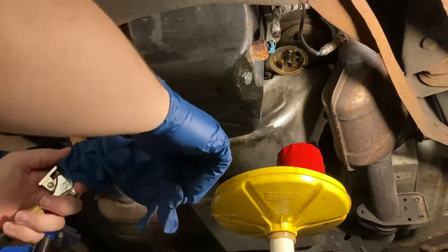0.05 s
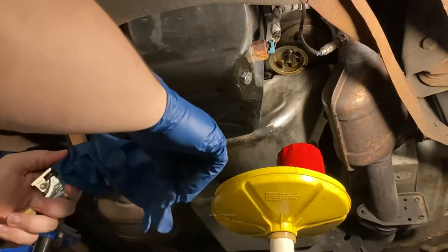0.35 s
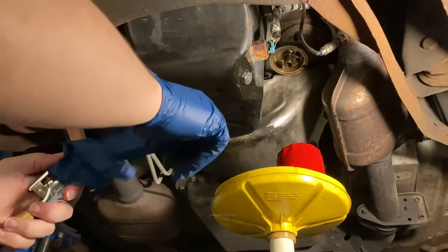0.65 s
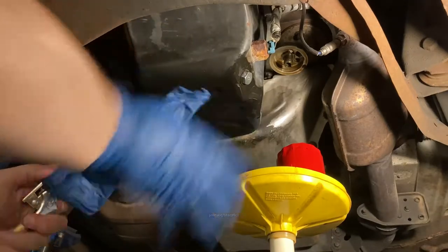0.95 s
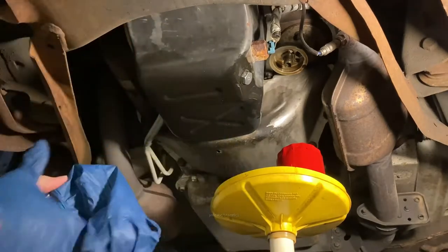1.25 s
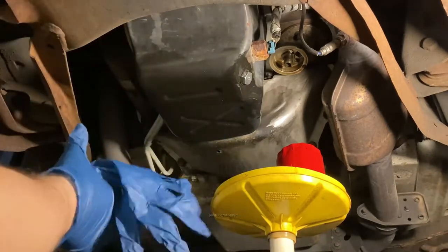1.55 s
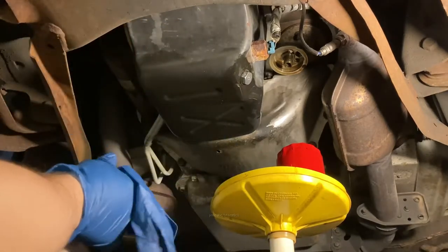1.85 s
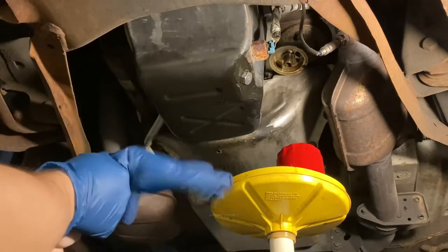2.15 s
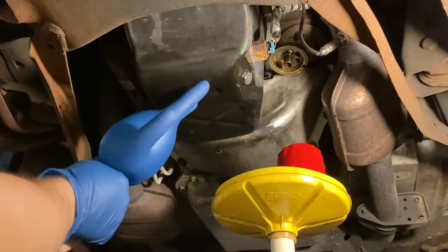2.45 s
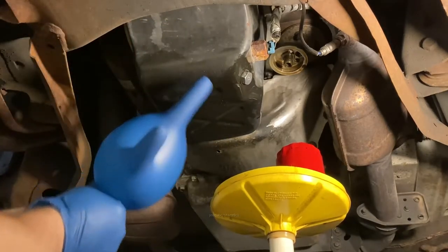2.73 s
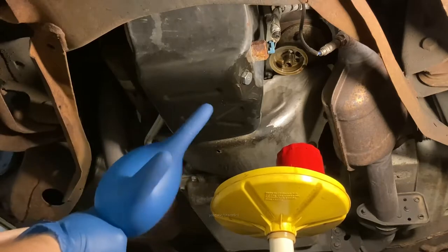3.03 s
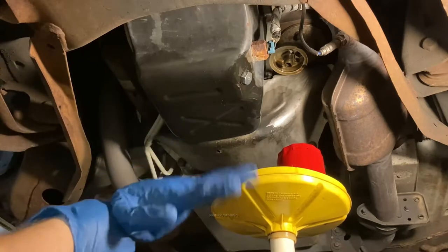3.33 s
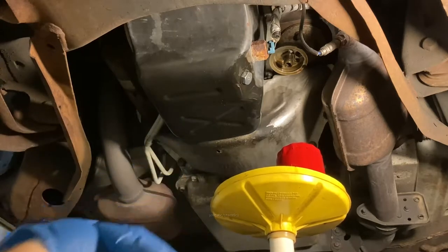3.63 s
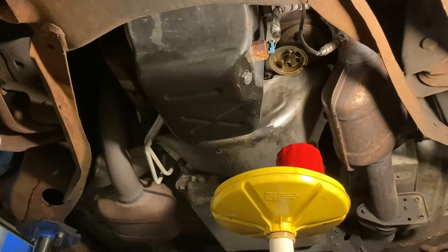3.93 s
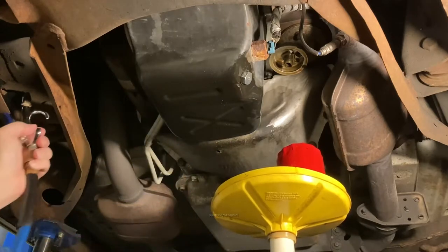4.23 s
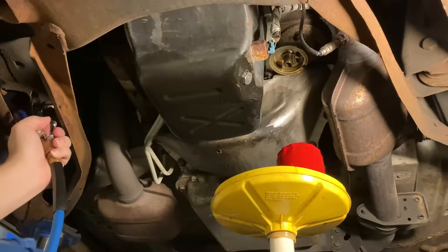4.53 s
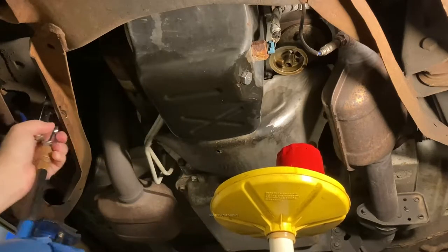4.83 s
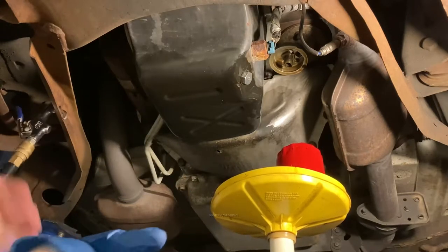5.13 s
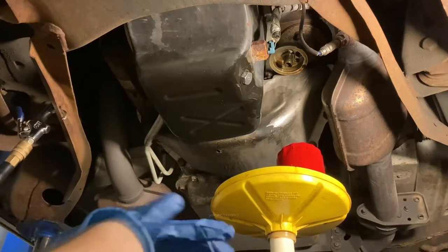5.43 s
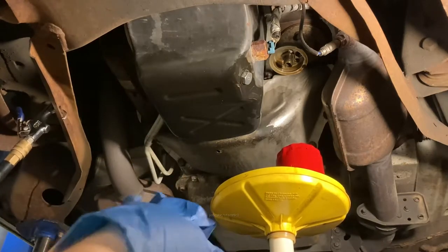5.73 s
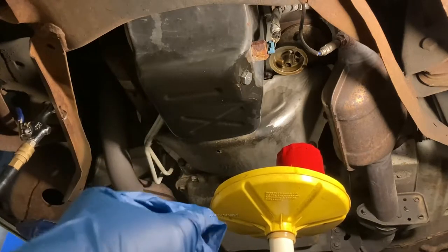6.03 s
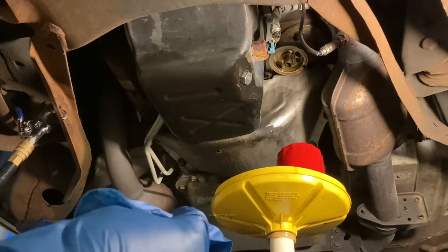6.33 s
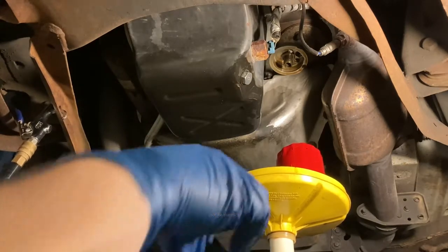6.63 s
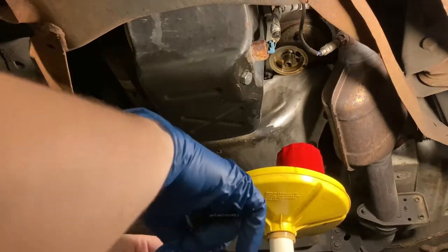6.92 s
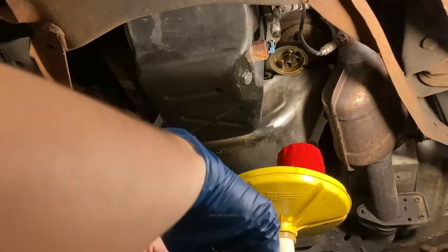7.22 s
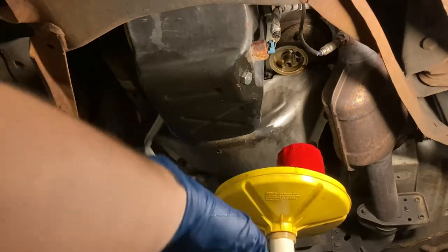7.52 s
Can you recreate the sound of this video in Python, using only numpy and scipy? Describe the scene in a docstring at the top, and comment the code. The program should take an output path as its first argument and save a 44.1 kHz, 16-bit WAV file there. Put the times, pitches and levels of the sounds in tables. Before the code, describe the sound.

A thin, shifting hiss of escaping air runs beneath two close, nearly dry blasts from an air gun into a rubber glove: one brief and fluttering, one longer and hollow. The glove softly deflates and the leak dies away. A small cluster of metallic knocks follows, slightly left, as the gun meets a car's chassis, then very quiet glove rustles. A far machine hums low in the garage throughout.

```python
"""An air gun fires two blasts into a rubber glove, under a car in a garage.
The first blast flaps the loose cuff; the second seals it, and the glove swells, then sighs empty.
The gun leaks, so it hisses until it is carried off and hung on the steel chassis with a few knocks.
Rubber gloves then rub and crinkle, and a distant machine hums low under it all."""
import sys
import numpy as np
from scipy import signal
from scipy.fft import rfft, irfft
from scipy.io import wavfile

SR = 44100
rng = np.random.default_rng(int(sys.argv[2]) if len(sys.argv) > 2 else 0)


def transcribe(u):
    """Save the signal u as a 16-bit wav file named by the first command-line argument.

    u: samples, shape (n,) or (channels, n), limited to [-1, 1]; the rate is SR.
    q: integer samples, one column per channel.
    """
    v = np.clip(np.atleast_2d(u).T, -1, 1)
    q = np.round(v * 32767).astype(np.int16)
    wavfile.write(sys.argv[1], SR, q)


N = 338228
TIME, HZ = np.arange(N) / SR, np.fft.rfftfreq(N, 1 / SR)

# Pulls of the trigger. Each row: time fully open and time held in seconds; levels in dB of the jet,
# the cuff and the glove's hollow; boost of the first flap in dB; the hollow's pitch in Hz when empty
# and when full; the hollow's head start in seconds; flutter from 0 to 1.
TRIGGER_PULLS = [(0.429, 0.14, -12.5, -22, -26, 5.5, 1371, 1214, -0.0048, 0.3),
                 (2.108, 0.8, -16, -25.5, -26, 14, 1645, 891.4, .014, 0)]


def blasts(fill_s=0.11, taut_s=0.058, snap_s=0.016, hollow_width_hz=900):
    """The jet fizzes, the loose cuff slaps, and the glove's hollow sinks in pitch as it swells."""
    # Tone of the nozzle jet and of the rasping cuff. Each row: frequency in Hz, level in dB.
    jet_tone = [(200, -31.5), (2000, -31), (5000, -33.5), (7000, -7), (8300, -2.5), (9400, 2.5),
                (12000, 1.5), (14000, -2.5), (15800, -4.5)]
    cuff_tone = [(60, -34), (170, -12.5), (400, -2), (1000, -3), (2000, -3), (2750, 1), (3700, 5),
                 (4500, 2.5), (6500, 1), (8500, 0.5), (15000, -22)]
    swirl_tone = [(60, -10), (300, -3.5), (550, -0.5), (900, -2.5), (1500, -4), (3000, -0.5),
                  (8000, -23.5)]
    # The cuff gapes and lets more air past. Each row: time and half length in seconds,
    # change of the rasp in dB, change of the hollow in dB.
    gapes = [(0.462, 0.0075, 4.5, 1.5), (0.549, 0.013, 6, 1), (2.112, 0.006, 3.5, -2), (2.357, 0.055, 2, 6),
             (2.868, 0.011, 2.5, -5), (3.075, 0.04, 4.5, 6)]
    jet = air(jet_tone, direct=0.52, lag=10)
    cuff = air(cuff_tone, direct=0.5, lag=6.38)
    flapping = treble(cuff, corner_hz=1300)
    swirl = pan(air(swirl_tone, direct=0.96, lag=6.65), left_db=3.5)  # air inside the glove
    slaps = wander(170, N)
    shudder_db = 1.8 * wander(90, N)  # the stretched rubber shakes unevenly
    cuff_gape = amp(sum(db * bell(TIME - s, half) for s, half, db, _ in gapes))
    hollow_gape = amp(sum(db * bell(TIME - s, half) for s, half, _, db in gapes) + shudder_db)
    out = np.zeros((2, N))

    def flow(span, jet_db, rasp, hollow, flutter):
        """The cuff opens and shuts, chopping both the jet and the sound of the glove."""
        gap = np.exp(.5 * flutter * slaps[span] - (.5 * flutter) ** 2)  # keeps the average power
        glove = cuff_gape[span] * rasp + hollow_gape[span] * hollow
        return amp(jet_db) * jet[:, span] * gap ** 0.6 + gap * glove

    for start, held, jet_db, cuff_db, hollow_db, flap_db, empty_hz, full_hz, early, flutter \
            in TRIGGER_PULLS:
        span = (TIME > start - .5) & (TIME < start + held + .5)
        t, inside = TIME[span] - start, swirl[:, span]
        # the factors on these times are rises and falls in dB per second
        age, since_shut = np.maximum(t, 0), np.maximum(t - held, 0)
        opening_db = 852.5 * np.minimum(t, 0)
        hollow_shape_db = 1398 * np.minimum(t + early, 0) - 10 * age - 281.5 * since_shut
        # the cuff flaps ever more weakly, until the glove snaps taut with a low puff
        loose = np.interp(t, [0, taut_s, taut_s + snap_s], [1, 0.53, 0])
        puff = amp(-28) * bell(t - taut_s, 0.019) * band(inside, 465, width_hz=1000)
        rasp = cuff[:, span] + (amp(flap_db * loose) - 1) * flapping[:, span]
        rasp *= amp(cuff_db + opening_db - 174 * since_shut)
        hz = full_hz + (empty_hz - full_hz) * np.exp(-age / fill_s)
        body = amp(4.5 * loose) * band(inside, hz, hollow_width_hz)
        overtone = amp(-24.5) * band(inside, 2.5 * hz, hollow_width_hz)
        # the hollow rings briefly as the air first strikes it
        ring = amp(4) * bell(t + early - 0.0099, 0.025) * band(inside, hz, width_hz=380)
        hollow = (body + overtone + ring) * amp(hollow_db + hollow_shape_db)
        fizz_db = jet_db + opening_db + 2.5 * loose - 396.5 * since_shut
        out[:, span] += flow(span, fizz_db, rasp + puff, hollow, flutter + 0.19 * loose * (t > 0))

    # after the last blast the glove sighs empty: steady for a moment, then fading
    let_go = start + held
    span = (TIME > let_go) & (TIME < let_go + 1)
    fade_db = -150 * np.maximum(TIME[span] - let_go - 0.22, 0)
    rasp = amp(fade_db - 38) * cuff[:, span]
    hollow = amp(fade_db - 46) * band(swirl[:, span], 1310, hollow_width_hz)
    out[:, span] += flow(span, fade_db - 38.5, rasp, hollow, flutter=0.26)
    return out


def leak(waver_db=0.84, sag_db=-11):
    """A thin jet escapes from the gun and changes tone as the gun is carried away."""
    # The leak as the gun moves. Each row: time in seconds, level in dB, brightness in dB.
    course = [(0, -38.5, -2.5), (.2, -34.5, 2.5), (.4, -28, 3), (.9, -24.5, -1.5), (1.1, -25.5, 0.5),
              (1.22, -25.5, 2.5), (1.35, -30.5, -3), (1.85, -29, -6), (2.1, -31, 2), (3.201, -46, -12),
              (3.55, -42, -6), (3.8, -41, -3.5), (3.97, -42.5, -7), (4.28, -51, -4.5), (4.55, -68, -14.5)]
    # Its tone beside the glove and at arm's length. Each row: frequency in Hz, level in dB.
    near_tone = [(150, -8.5), (400, -13.5), (1000, -18), (1800, -14), (2450, -3.5), (3400, 0), (4300, -6.5),
                 (6300, 0.5), (7400, -5.5), (9000, -3.5), (10800, -7), (13000, -0.5), (15600, -10)]
    far_tone = [(150, -10), (400, -32), (1200, -43), (1700, -7), (2200, -2), (3400, -0.5), (5300, -2.5),
                (6500, 1), (8800, 1), (10800, -3.5), (13000, 1), (14500, -3), (15600, -7.5)]
    # Narrow bands of hiss stand out and glide as the gun turns. Each row: time and half length in
    # seconds, pitch in Hz, glide in octaves per second, level against the hiss in dB.
    glints = [(0.947, 0.17, 6340, 0.089, -4.5), (1.375, 0.089, 7600, 0.27, -8.5),
              (3.97, 0.047, 3800, 1.4, -4.5), (4.002, 0.14, 2450, 0.34, -5.5), (4.12, .08, 6800, 0.56, -10),
              (4.263, 0.13, 4600, 0.38, -7)]
    level_db, bright_db = follow(course, TIME)
    for start, held, *_ in TRIGGER_PULLS:  # each blast drains the hose, so the leak sags
        level_db += sag_db * bell(TIME - start - held - 0.105, 0.062)
    away = np.interp(TIME, [2.2, 3.3], [0, 1])
    near = pan(air(near_tone, direct=0.62, lag=9.96), left_db=0.5)
    far = pan(air(far_tone, direct=0.72, lag=11.9), left_db=1)
    hiss = np.sqrt(1 - away) * near + np.sqrt(away) * far
    hiss += (amp(bright_db) - 1) * treble(hiss, corner_hz=7005)
    hiss = surface_echo(hiss) / amp(bright_db / 2)
    white = air([(100, 0), (16000, 0)], direct=0.87, lag=9.38)
    for at, half, hz, glide, db in glints:
        span = abs(TIME - at) < .5
        t = TIME[span] - at
        glint = band(white[:, span], hz * 2 ** (glide * t), width_hz=750)
        hiss[:, span] += amp(db) * bell(t, half) * glint
    hiss *= amp(level_db + waver_db * wander(25, N)) * (TIME < course[-1][0])
    return near_echoes(hiss, echo=.27, drift=.1, first_s=0.000504, last_s=.005)


def knocks(boom_hz=720, bright_hz=2000, tick_s=0.015, thud_rise_s=0.00033, ring_rise_s=0.00076):
    """Each knock ticks, chatters and rings the steel: hard ones wake high notes, blunt ones low."""
    # Gun and hand hit the chassis. Each row: start in seconds; level, brightness and hollow boom
    # in dB; length of the chatter in seconds.
    hits = [(4.445, -39.5, -2, 5, 0.006), (4.452, -30.5, -35, 8.5, 0.019), (4.6, -44.5, 6, 1, 0.0093),
            (4.61, -42, -5, 13, 0.027), (4.669, -44.5, 0, 8, 0.27), (4.716, -26, 7.5, -4, 0.012),
            (4.722, -18.5, -7, -1.5, 0.031), (4.738, -33, -11, 2, 0.0083), (4.835, -45, -5, -1, 0.034),
            (4.914, -54, 6, -2.5, 0.0082), (5.313, -46.5, -8.5, -16, 0.01), (7.085, -52.5, -9.5, -12, .004)]
    # Tone of the chatter. Each row: frequency in Hz, level in dB.
    chatter_tone = [(100, -29), (220, -32.5), (320, -8.5), (420, -14), (600, -2.5), (790, -6.5), (980, -1),
                    (1350, -6.5), (1900, -5.5), (2600, -18), (3700, -9), (4600, -12.5), (5700, -24),
                    (10000, -23), (15000, -48)]
    # Notes of the chassis. Each row: pitch in Hz, relative level in dB, seconds to fade by 60 dB.
    steel_notes = [(325, -3.5, 0.073), (526, 6, 0.092), (636, 5.5, 0.14), (973, 3, 0.15), (1030, 0, 0.13),
                   (1100, 2.5, 0.11), (1290, -0.5, 0.11), (1413, 0.5, 0.091), (1614, -2.5, 0.19),
                   (1720, -4, 0.3), (2010, -11, 0.44), (2345, -17.5, 0.19), (2980, -15, 0.18),
                   (3670, -13, 0.23), (4440, -9.5, 0.17)]
    chatter = air(chatter_tone, direct=0.24, lag=5.3)
    low, top = chatter - treble(chatter, boom_hz), treble(chatter, bright_hz)
    tick = treble(top, corner_hz=6000)
    hz, note_db, fade_s = np.transpose(steel_notes)[:, :, None]
    high, deep = hz ** 4 / (hz ** 4 + bright_hz ** 4), boom_hz ** 4 / (hz ** 4 + boom_hz ** 4)
    t, out = TIME[:SR // 2], np.zeros((2, N))
    for start, level_db, bright_db, boom_db, length in hits:
        span = slice(round(start * SR), round(start * SR) + len(t))
        edge = top[:, span] - (1 - np.exp(-t / tick_s)) * tick[:, span]  # the sharpest part dies first
        contact = chatter[:, span] - top[:, span] + amp(bright_db) * edge
        contact += (amp(boom_db) - 1) * low[:, span]
        thud = (1 - np.exp(-t / thud_rise_s)) * np.exp(-(t / length) ** 2) * contact
        heights = amp(note_db + bright_db * high + boom_db * deep) / np.linalg.norm(amp(note_db))
        phase = rng.random(hz.shape) + 0.19 * rng.standard_normal((2, *hz.shape))  # one per side
        # each knock lands on another spot, which shifts the level and pitch of every note
        louder, sharper = rng.standard_normal((2, *hz.shape))
        pitch = hz * (1 + .005 * sharper)
        notes = heights * amp(2 * louder - 60 * t / fade_s) * np.sin(2 * np.pi * (pitch * t + phase))
        ring = notes.sum(1) * (1 - np.exp(-t / ring_rise_s))
        out[:, span] += amp(level_db) * (.42 * thud + 1.15 * ring)
    return pan(out, left_db=3)


def clinks(touch_s=4.446, settle_s=4.979):
    """Small metal parts ring softly: the gun as it first touches, its hook as it settles."""
    # Notes of the gun and its hook. Each row: pitch in Hz, level in dB, seconds to fade by 60 dB.
    gun_notes = [(3020, -60, 0.18), (4530, -52, 0.12)]
    hook_notes = [(340, -44, 0.12), (656, -49, 0.062), (1147, -46, 0.13), (1190, -51, .06)]
    out = np.zeros(N)
    for start, notes, rise_s in [(touch_s, gun_notes, 0.0005), (settle_s, hook_notes, 0.0039)]:
        t = np.maximum(TIME - start, 0)
        rise = 1 - np.exp(-t / rise_s)
        for hz, db, fade_s in notes:
            out += rise * amp(db - 60 * t / fade_s) * np.sin(2 * np.pi * (hz * t + rng.random()))
    return pan(out, left_db=2)


def rustles(grain_db=3):
    """Rubber slides over rubber in short grainy strokes."""
    # Rubs and snaps. Each row: time in seconds, level in dB, brightness in dB, half length in seconds.
    strokes = [(5.343, -56, 15, 0.0021), (5.35, -62, 12, 0.029), (5.416, -58.5, 6, 0.018),
               (5.464, -62, -14, 0.0038), (5.5, -66, -15, 0.0042), (5.554, -68, -8, .004),
               (6.011, -71.5, -14.5, 0.0075), (6.9, -69.5, 6.5, 0.021), (6.949, -52.5, -3, 0.0038),
               (7.07, -62, 5.5, 0.024), (7.229, -63, -4, 0.0032), (7.424, -51, 18.5, 0.0061),
               (7.435, -63, 2.5, 0.029), (7.529, -68.5, 7, 0.0095), (7.595, -64.5, 7, 0.028)]
    # Tone of the rubbing. Each row: frequency in Hz, level in dB.
    rubber_tone = [(200, -5.5), (800, 9), (1500, 12.5), (3000, 5), (5500, -9.5), (8000, -1.5), (12000, -3),
                   (15500, -8)]
    rub = air(rubber_tone, direct=0.16, lag=7.7) * amp(grain_db * wander(320, N))
    top = treble(rub, corner_hz=4800)
    return sum(amp(db) * bell(TIME - s, half) * unit(rub + (amp(bright_db) - 1) * top)
               for s, db, bright_db, half in strokes)


def crinkles(per_s=110, spread_db=2.5, fade_s=.006):
    """Folds of the handled glove flip over with tiny ticks of uneven size."""
    # How hard the glove is handled. Each row: time in seconds, level in dB.
    handling = [(5.25, -70), (5.551, -68), (5.9, -74), (6.5, -72), (6.95, -74), (7.65, -70)]
    # Tone of a crinkle. Each row: frequency in Hz, level in dB.
    crinkle_tone = [(300, -16.5), (1300, 3.5), (3500, 0.5), (5500, -15.5), (7500, -14), (12000, -14),
                    (15500, -19)]
    flips = rng.random(N) < per_s / SR
    sizes = flips * amp(spread_db * np.minimum(rng.exponential(1, N), 3))
    ticks = unit(signal.lfilter([1], [1, -np.exp(-1 / (fade_s * SR))], sizes))
    level = amp(follow(handling, TIME)[0]) * (TIME > handling[0][0])
    return air(crinkle_tone, direct=0.33, lag=7.6) * ticks * level


def background(room_db=-57, early_boost_db=5, drop_s=2.2):
    """Dull room noise and the unsteady hum of a distant machine, which steps down in level once."""
    # Tone of the room noise. Each row: frequency in Hz, level in dB.
    room_tone = [(20, -44.5), (32, -26), (45, 0), (62, -3), (84, -2), (110, -16.5), (160, -17.5),
                 (220, -9.5), (400, -14.5), (800, -18), (1500, -24.5), (2150, -25), (2800, -32.5),
                 (4200, -31), (5000, -39), (8000, -39), (13000, -47), (15500, -60)]
    # The machine's hum. Each row: pitch in Hz, level after the drop in dB, width in Hz.
    hum_bands = [(63.8, -65.5, 8.3), (79.5, -55, 13), (154.5, -64.5, 10)]
    rumble = air([(50, 0.012), (200, 0)], direct=0.74, lag=-15)
    hum = sum(amp(db) * band(rumble, hz, width) for hz, db, width in hum_bands)
    hum *= amp(early_boost_db * (TIME <= drop_s))
    return pan(amp(room_db) * air(room_tone, direct=0.12, lag=-14) + hum, left_db=-1)


def surface_echo(x, blur_above=2.4):
    """An echo off the nearest surface cuts a notch in the tone, which rises as the gun closes in."""
    # The gun passes a surface. Each row: time in seconds, lowest notch in Hz, echo strength 0 to 1.
    passes = [(.8, 1490, 0), (1.15, 3400, 0), (1.3, 5470, 0.2), (1.55, 6200, 0.1), (1.8, 10200, 0),
              (2.2, 9800, 0.23), (3.549, 1800, 0), (3.78, 5300, 0.18), (4.021, 5900, 0.35), (4.2, 9000, 0),
              (4.4, 9900, 0.2)]
    hz, t, spectrum = signal.stft(x, SR, nperseg=512, noverlap=384)
    notch_hz, strength = follow(passes, t)
    ratio = hz[:, None] / notch_hz
    echo = strength / (1 + (ratio / blur_above) ** 4)  # the surface is uneven, so higher notches blur
    paths = (1 + echo * np.exp(-1j * np.pi * ratio)) / np.sqrt(1 + echo ** 2)
    return signal.istft(spectrum * paths, SR, nperseg=512, noverlap=384)[1][:, :N]


def near_echoes(x, echo, drift, first_s, last_s, corner_hz=900, count=8):
    """Echoes off arm, glove and car cut rows of notches in the tone, which slide as the hand moves."""
    # The hand's distance from these surfaces. Each row: time in seconds, factor on the echo delays.
    distances = [(0, 1.095), (2.2, 1.057), (3.7, 1.4), (4.4, 1.37)]
    hz, t, spectrum = signal.stft(x, SR, nperseg=1024, noverlap=768)
    f, reach, paths = hz[:, None], follow(distances, t)[0], 1
    strength = echo * f ** 2 / (f ** 2 + corner_hz ** 2)  # small surfaces return only short waves
    for delay in np.geomspace(first_s, last_s, count):
        moving_delay = delay * (reach * rng.uniform(0.92, 1.15) + drift * wander(1.5, len(t)))
        paths = paths + strength * np.exp(-2j * np.pi * f * moving_delay)
    paths = paths / np.sqrt(np.mean(abs(paths) ** 2, axis=0))
    return signal.istft(spectrum * paths, SR, nperseg=1024, noverlap=768)[1][:, :N]


def garage(x, echoes_per_s=3000):
    """The room returns scattered echoes, and each frequency dies away at its own speed."""
    # How long the room rings. Each row: frequency in Hz, seconds to fade by 60 dB.
    fade_times = [(150, 0.79), (600, 0.32), (1800, 0.32), (4000, 0.17), (9000, 0.18), (16000, 0.34)]
    signs = rng.choice([-1., 1.], (2, SR))
    echoes = signs * (rng.random((2, SR)) < echoes_per_s / SR) * (TIME[:SR] > .006)
    hz, t, spectrum = signal.stft(echoes, SR, nperseg=256)
    fade = amp(-60 * t / read(fade_times, hz)[:, None])
    tail = signal.istft(spectrum * fade, SR, nperseg=256)[1]
    return signal.fftconvolve(x, tail / np.linalg.norm(tail[0]), axes=1)[:, :N]


def air(tone, direct, lag):
    """Stereo noise of a given tone: direct makes the sides alike, lag delays the right in samples."""
    # How alike the two sides sound: nearly the same in bass and high treble, wide in between.
    # Each row: frequency in Hz, likeness from 0 to 1.
    likeness = [(100, 0.93), (250, 0.89), (500, 0.3), (1000, 0.16), (5500, 0.2), (7000, 1), (9200, 1),
                (10300, 0.6), (11400, .95), (13500, .95), (15500, .85)]
    left, other = rfft(rng.standard_normal((2, N)))
    same = np.clip(direct + (1 - direct) * read(likeness, HZ), 0, 1)
    # the high treble has a phase shift of its own, whatever the lag
    phase = 2 * np.pi * np.where(HZ < 6500, HZ * lag / SR, (7000 - HZ) / 4400)
    right = (same * left + np.sqrt(1 - same ** 2) * other) * np.exp(-1j * phase)
    return unit(irfft(np.array([left, right]) * amp(read(tone, HZ)), N))


def band(x, hz, width_hz):
    """Keeps a band around the pitch hz, which may glide, and scales it to an average power of 1."""
    turn = np.exp(2j * np.pi * np.cumsum(hz * np.ones(x.shape[-1])) / SR)
    decay = np.exp(-np.pi * width_hz / SR)
    for _ in range(2):  # two resonances in a row make steeper edges
        x = 2 * (turn * signal.lfilter([1 - decay], [1, -decay], x / turn + 1e-18)).real
    return unit(x)


def treble(x, corner_hz):
    """The part of a sound above a soft corner."""
    return irfft(rfft(x) * HZ ** 4 / (HZ ** 4 + corner_hz ** 4), N)


def wander(rate_hz, size):
    """A smooth random curve of average power 1, with size points across the whole scene."""
    f = np.arange(size // 2 + 1) * SR / N
    return unit(irfft(rfft(rng.standard_normal(size)) / (1 + (f / rate_hz) ** 4), size))


def bell(t, half):
    """A smooth swell of height 1 around t = 0."""
    return np.exp(-(t / half) ** 2 / 2)


def follow(table, t):
    """Joins the rows of a time table with straight lines, giving one curve per value column."""
    times, *columns = np.transpose(table)
    return [np.interp(t, times, column) for column in columns]


def read(table, hz):
    """Reads between the rows of a frequency table, on a logarithmic scale."""
    f, value = np.transpose(table)
    return np.interp(np.log(hz + 1), np.log(f + 1), value)


def pan(x, left_db):
    """Shifts a sound to the left, or to the right if left_db is negative."""
    return x * amp([[left_db / 2], [-left_db / 2]])


def amp(db):
    """Turns decibels into a gain."""
    return 10 ** (np.asarray(db) / 20)


def unit(x):
    """Scales to an average power of 1."""
    return x / np.sqrt(np.mean(x ** 2) + 1e-20)


def scene():
    """The blasts are close and nearly dry; the deep part of the knocks spreads through the room."""
    blast = near_echoes(blasts(), echo=.25, drift=.05, first_s=.0008, last_s=.006)
    knock = knocks() + clinks()
    room = garage(amp(-17.5) * blast + amp(-5.5) * (knock - treble(knock, corner_hz=4130)))
    return leak() + blast + knock + rustles() + crinkles() + background() + room


def record(dry, threshold_db=-25, share=0.59, recovery_db_per_s=2.0, memory_s=0.24):
    """The volume ducks under the blasts and recovers slowly; deep bass and top treble are cut."""
    decay = np.exp(-1 / (memory_s * SR))
    power_db = 10 * np.log10(signal.lfilter([1 - decay], [1, -decay], (dry ** 2).mean(0)) + 1e-12)
    excess_db = np.maximum(power_db - threshold_db, 0)
    recovery_db = recovery_db_per_s * TIME
    duck_db = np.maximum.accumulate(share * excess_db + recovery_db) - recovery_db
    thinned = signal.sosfilt(signal.butter(3, 42, "high", fs=SR, output="sos"), dry)
    treble_cut = signal.firwin(511, 15850, window=("kaiser", 9), fs=SR)
    return signal.oaconvolve(thinned * amp(-duck_db), treble_cut[None], "same")


dry = scene()
out = record(dry)
transcribe(out)
```